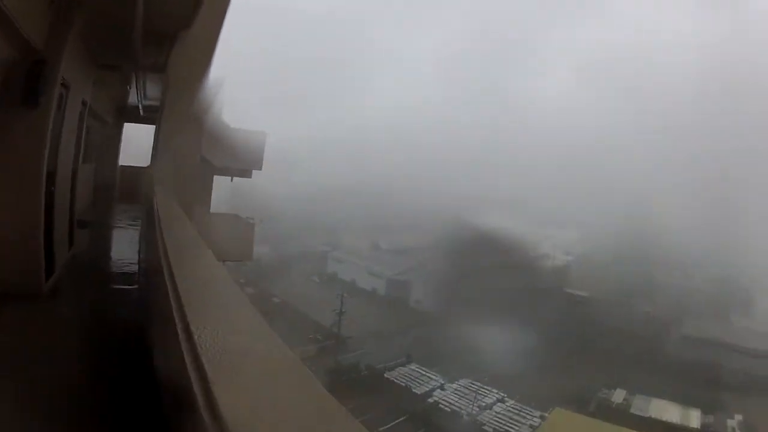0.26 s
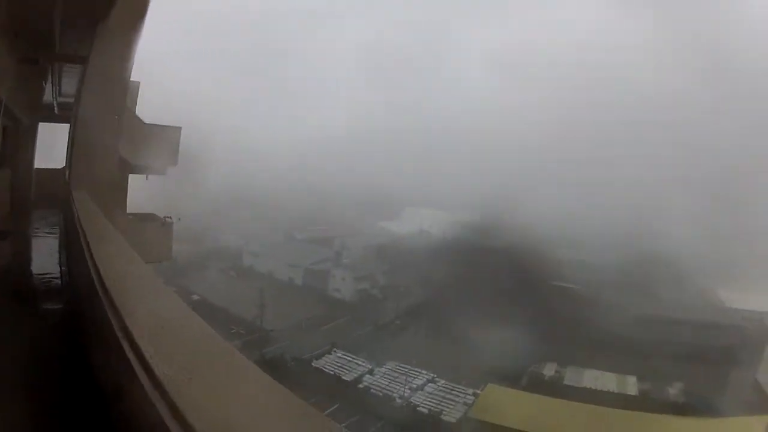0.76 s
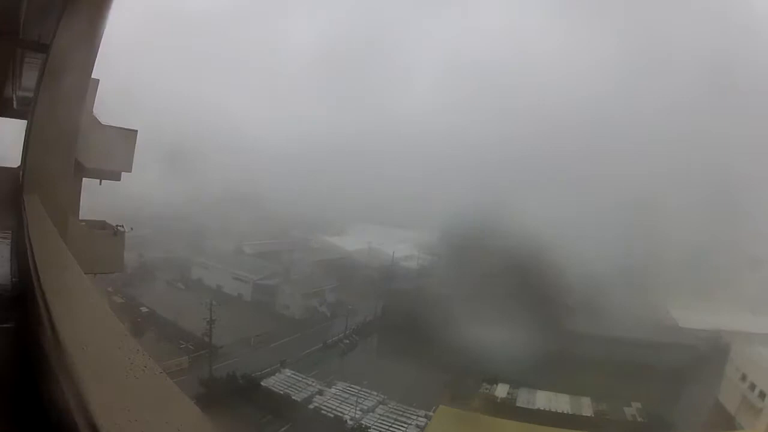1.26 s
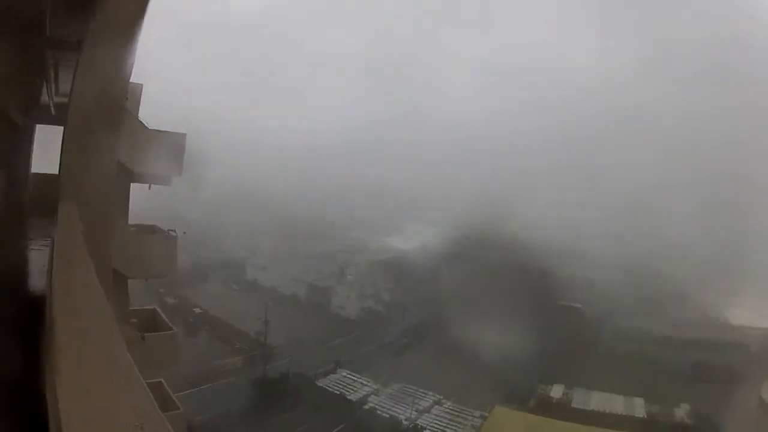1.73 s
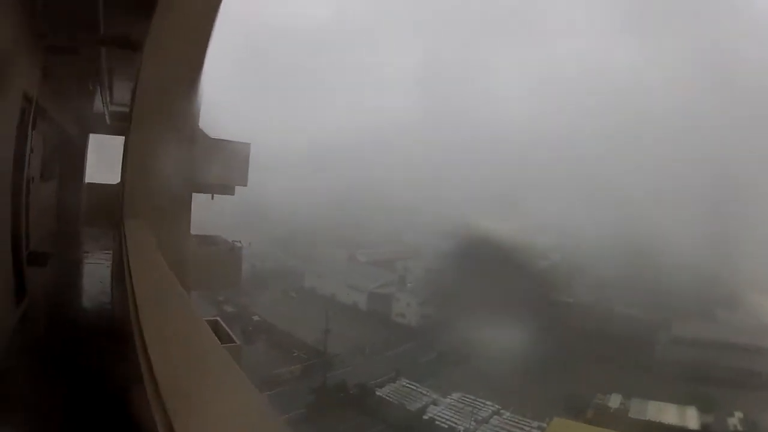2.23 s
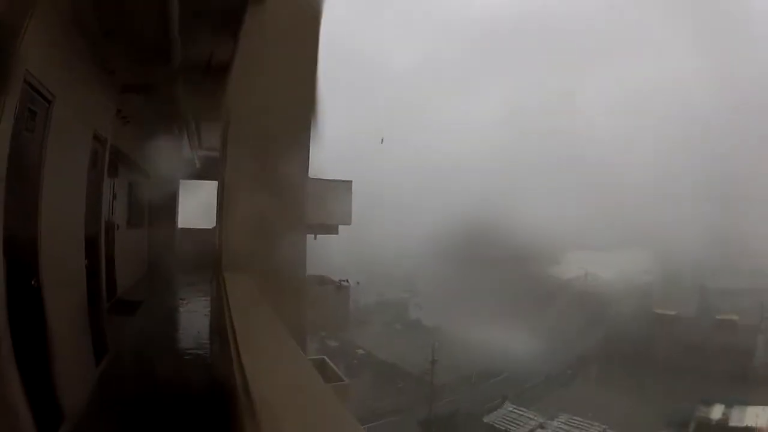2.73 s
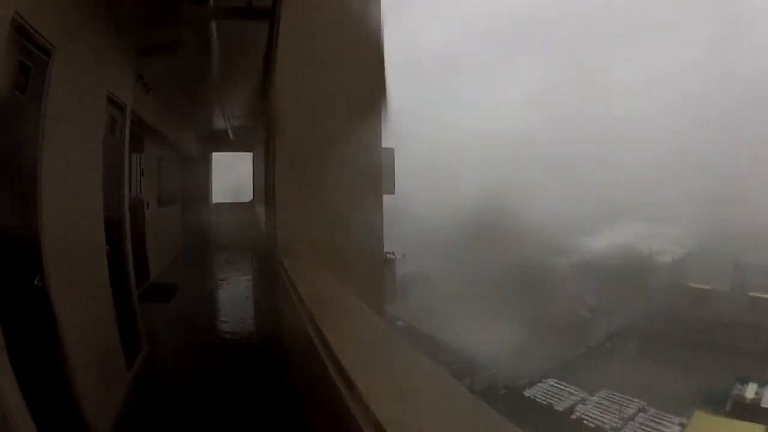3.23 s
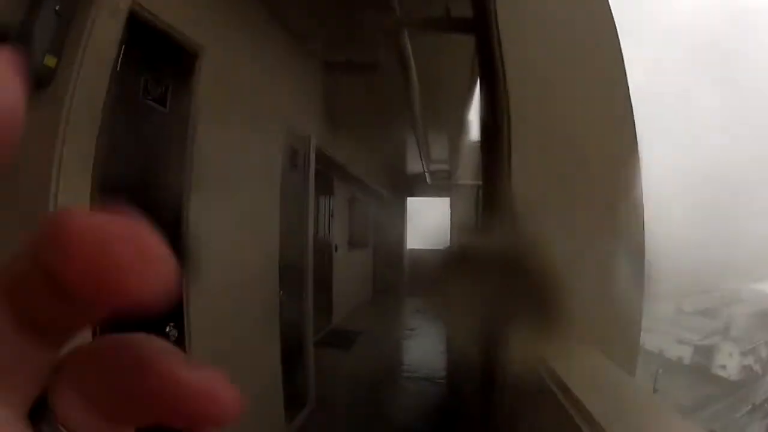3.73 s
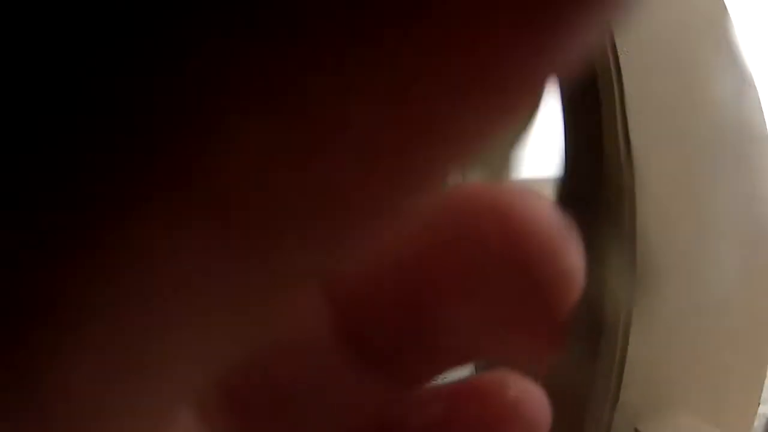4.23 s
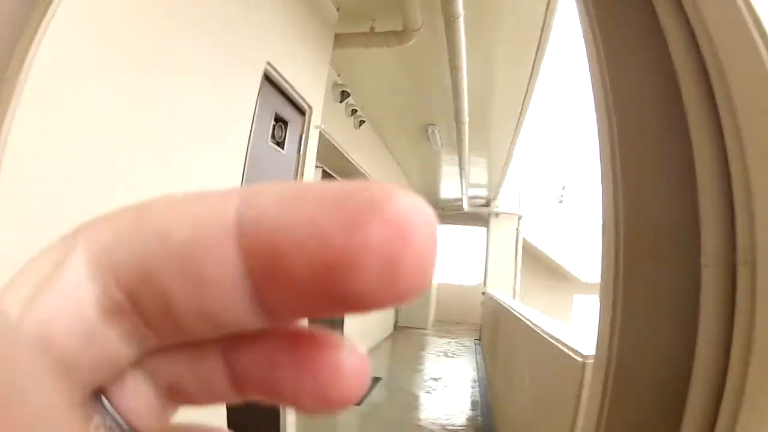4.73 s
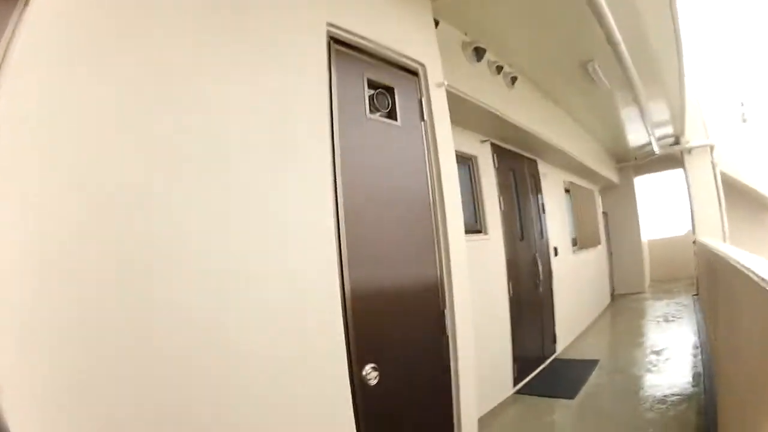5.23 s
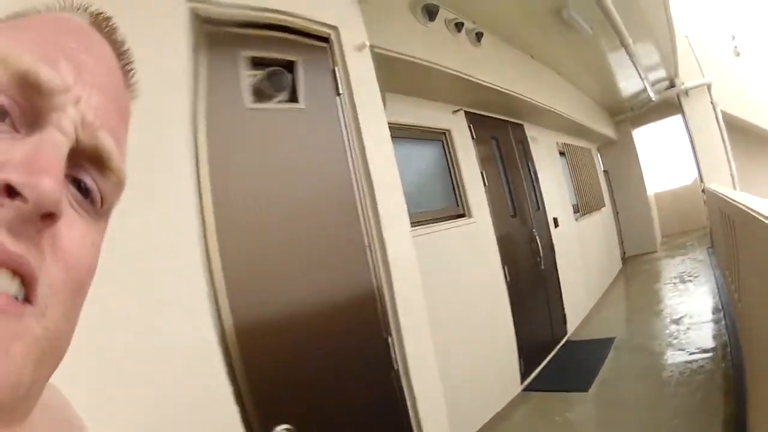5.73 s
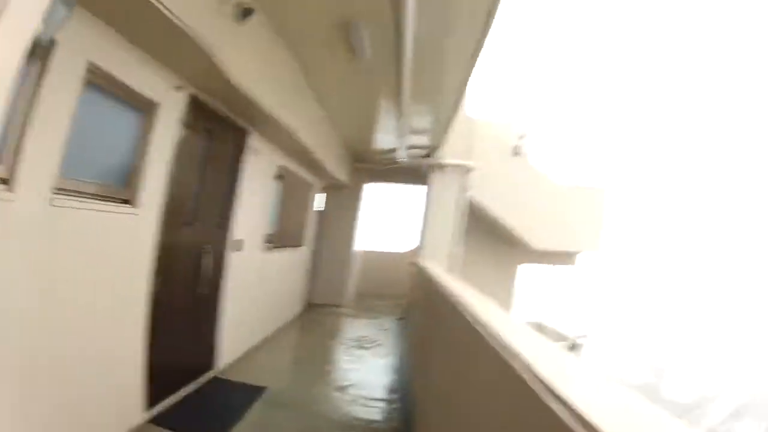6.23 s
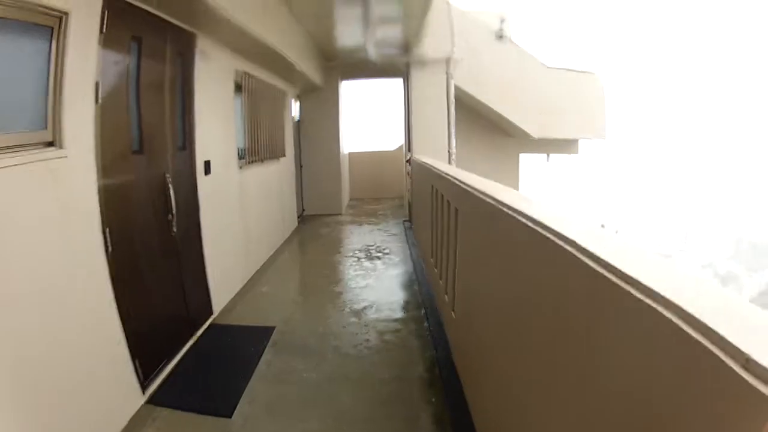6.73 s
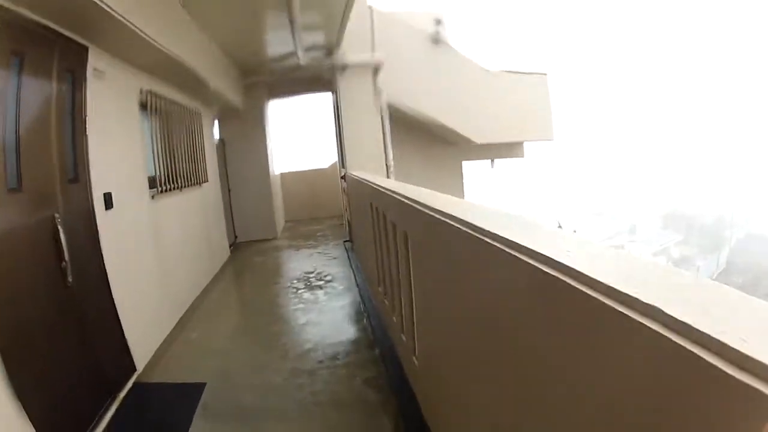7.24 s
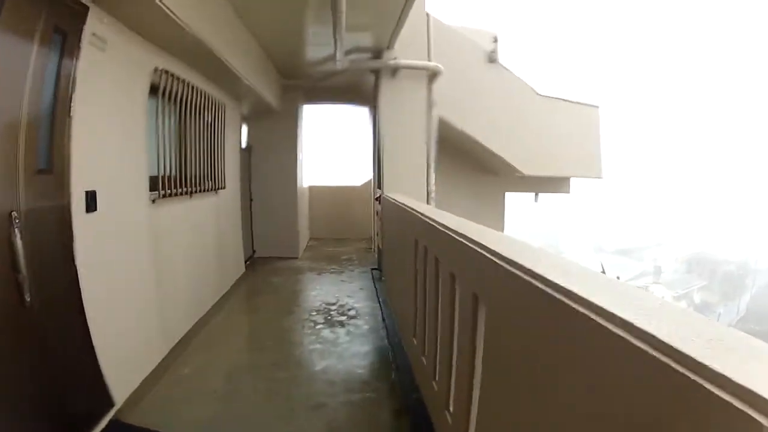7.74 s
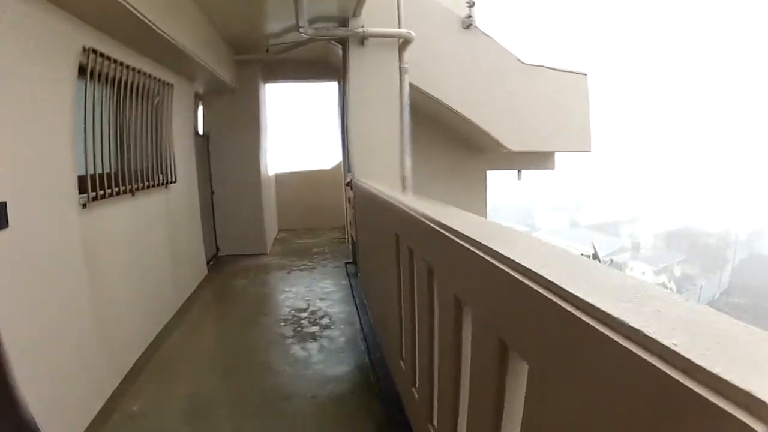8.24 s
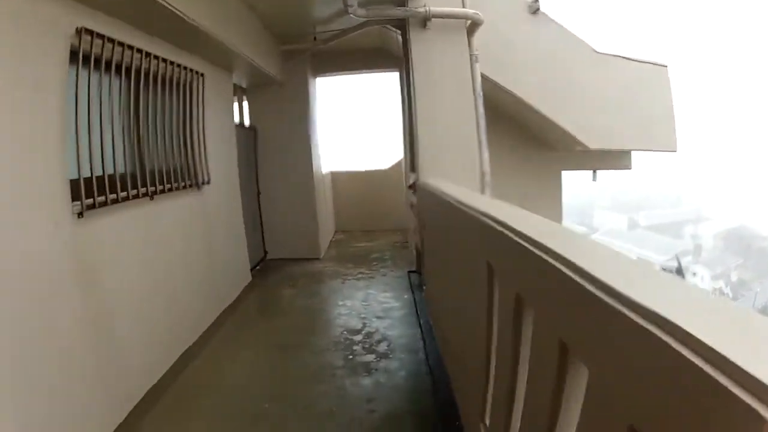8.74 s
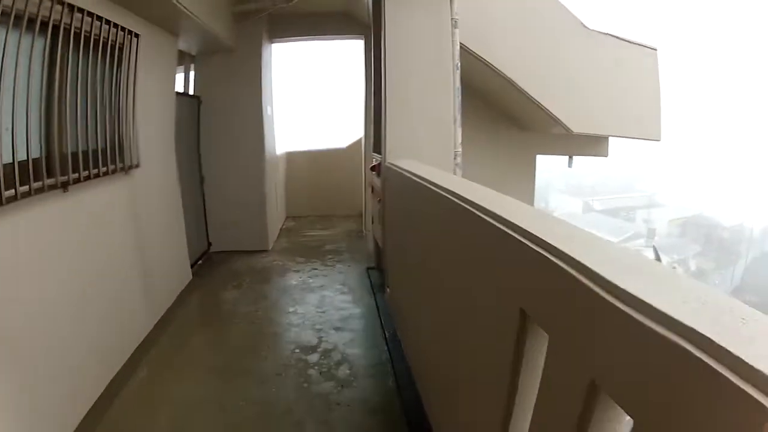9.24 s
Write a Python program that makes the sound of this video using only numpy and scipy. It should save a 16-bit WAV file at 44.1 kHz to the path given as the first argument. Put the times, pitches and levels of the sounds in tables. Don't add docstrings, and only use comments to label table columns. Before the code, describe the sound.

A handheld camera in a waterproof housing picks up constant storm wind on a high balcony corridor: soft low rumble beneath a coarse midrange roar. Grit clicks on the case a few times, then a very close, loud double thump and a short squeaky wipe interrupt. Afterwards thin, breathy railing whistles waver within the wind, which grows a little quieter towards the end.

```python
import sys
import numpy as np
from scipy import signal
from scipy.io import wavfile
from scipy.ndimage import uniform_filter1d

SR = 44100
rng = np.random.default_rng(int(sys.argv[2]) if len(sys.argv) > 2 else 0)


def voltage_ratio(decibels):
    exponent = np.asarray(decibels, float) / 20
    return 10 ** exponent


def wav_out(sig):
    wavfile.write(sys.argv[1], SR, np.round(np.clip(np.atleast_2d(sig).T, -1, 1) * 32767).astype(np.int16))


N = 417627


def evened(x):
    return x / np.sqrt(np.mean(x ** 2) + 1e-20)


def read(points, hz):
    f, value = np.transpose(points)
    return np.interp(np.log(hz + 1), np.log(f + 1), value)


def add(mix, s, sound):
    part = mix[round(s * SR):][:len(sound)]
    part += sound[:len(part)]


# time in seconds, level in dB.
GUST = [(0.0, -32.5), (0.73, -35.5), (1.5, -35), (1.74, -37), (2.77, -37.5), (3.66, -35.5), (4.53, -37.5),
        (4.93, -35), (5.41, -35), (5.72, -33), (5.99, -35), (7.09, -37), (7.36, -38), (7.78, -39),
        (8.52, -39), (9.2, -37.5), (9.47, -38)]
# time in seconds, amount turned from 0 to 1.
TURN = [(0, 1), (1.1, 0.4), (1.9, 0.24), (2.4, 0), (3.75, 0), (4.1, 0.77), (6.7, 0.88), (7.1, 0.15),
        (9.47, 0.3)]
# time in seconds, strength from 0 to 1.
EDDIES = [(1.45, 1), (2.45, .5), (3.5, 0.6), (4.55, 1), (5.9, 0.5), (6.7, 0.5)]
EDDY_S = 0.22


def wind(spectrum, answers, size, db, patchy_db, patch_hz, patch_s, flicker_db, flicker_s):
    hop = size // 4
    frames, hz = N // hop + 5, np.fft.rfftfreq(size, 1 / SR)
    t = np.arange(frames) * hop / SR
    real, imaginary, patches = rng.standard_normal((frames, len(hz), 3)).T

    patches = uniform_filter1d(patches, max(round(patch_hz * size / SR), 1), 0)
    patches = evened(uniform_filter1d(patches, max(round(patch_s * SR / hop), 1), 1))
    flicker = rng.standard_normal(frames)
    flicker = evened(uniform_filter1d(flicker, max(round(flicker_s * SR / hop), 1)))

    gust = np.interp(t, *np.transpose(GUST))
    turned = np.interp(t, *np.transpose(TURN))
    eddy = sum(k * np.exp(-((t - s) / EDDY_S) ** 2) for s, k in EDDIES)
    controls = np.array([gust - gust.mean(), turned - .5, eddy])
    centres, *amounts = np.transpose(answers)
    amounts = np.array([read(np.c_[centres, row], hz) for row in amounts])

    field_db = read(spectrum, hz)[:, None] + amounts.T @ controls
    field_db = field_db + patchy_db * patches + flicker_db * flicker
    field = (real + 1j * imaginary) * voltage_ratio(field_db)
    sound = signal.istft(field, nperseg=size, noverlap=size - hop)[1][:N]
    return voltage_ratio(db) * evened(sound)


# frequency in Hz, level in dB per Hz.
RUMBLE = [(8, -32), (20, 0.5), (45, 1.5), (62, 0.5), (95, -1.5), (130, 0), (155, -1.5), (185, -1.5),
          (260, -2), (305, -5), (400, -7), (700, -16), (900, -23.5), (1500, -80)]
# frequency in Hz, dB per dB of gust, dB when turned, dB in an eddy.
BUFFET_ANSWERS = [(60, 0, 2.5, 2.9), (219, 0.46, 0.5, -0.7)]


def buffeting():
    return wind(RUMBLE, BUFFET_ANSWERS, size=2048, db=-39.5, patchy_db=1.5, patch_hz=90, patch_s=.1,
                flicker_db=.9, flicker_s=.03)


# frequency in Hz, level in dB per Hz.
CASE = [(440, -34), (750, -19), (862, -13.5), (1120, -3), (1250, -3.5), (1330, -13), (1470, -6.5),
        (1680, -12.5), (1920, -1.5), (2860, -0.5), (3180, -3), (3620, -3.5), (4390, -14), (4790, -12),
        (6000, -22), (7800, -54), (13200, -120)]
# frequency in Hz, dB per dB of gust, dB when turned, dB in an eddy.
ROAR_ANSWERS = [(1110, 0.91, -3.5, .3), (1520, 0.68, -0.7, 4.7), (2680, 0.89, -0.9, 0.091),
                (4000, 0.51, 1.4, 0.32)]


def case_roar():
    return wind(CASE, ROAR_ANSWERS, size=512, db=-35.5, patchy_db=0.66, patch_hz=600, patch_s=0.054,
                flicker_db=0.08, flicker_s=.04)


# time in seconds, gain in dB.
AIR_DIP = [
    (4.345, 0.5),
    (4.349, -2),
    (4.357, -7),
    (4.367, 0),
]


def dipped(sound):
    return sound * voltage_ratio(np.interp(np.arange(N) / SR, *np.transpose(AIR_DIP)))


def ring(db, hz, rise, t60):
    t = np.arange(round(.15 * SR)) / SR
    return voltage_ratio(db - 60 * t / t60) * (1 - np.exp(-t / rise)) * np.sin(2 * np.pi * hz * t)


# start in seconds, peak in dB, frequency in Hz,
# rise in seconds, 60 dB decay in seconds.
PUSHES = [
    (4.3371, 11, 215, 0.0021, 0.015),
    (4.3471, 18.5, 148, 0.0003, 0.0082),
]


def add_pushes(mix):
    for s, *shape in PUSHES:
        add(mix, s, ring(*shape))


# start in seconds, peak in dB, frequency in Hz,
# swings until silent.
PULLS = [
    (3.977, -15.5, 55, 3.7),
    (4.3416, -6, 60, 2.6),
    (4.3455, 5.5, 327, 3.3),
    (4.353, -5, 78, 2.6),
    (4.756, -20, 140, 5),
    (4.7732, -10, 130, 5.2),
    (4.801, -21, 77, 2.4),
    (4.814, 1.5, 90.5, 3.1),
    (8.881, -25, 140, 5.5),
]
PULL_RISE_TURNS = 0.15


def add_pulls(mix):
    for s, db, hz, swings in PULLS:
        add(mix, s, -ring(db, hz, PULL_RISE_TURNS / hz, swings / hz))


# start in seconds, length in seconds, start frequency in Hz,
# end frequency in Hz, peak in dB.
SQUEAKS = [
    (4.661, .02, 1960, 2080, -18),
    (4.667, .022, 3950, 4550, -32),
    (4.681, .014, 2180, 2660, -23),
    (4.701, .01, 3200, 3700, -35),
    (4.807, .011, 1900, 1880, -16),
]


def squeak(length, start_hz, end_hz, db):
    t = np.arange(round(length * SR)) / SR
    wobble = 1 + 0.13 * uniform_filter1d(rng.standard_normal(2000), 60)[:len(t)]
    turns = np.cumsum(np.linspace(start_hz, end_hz, len(t)) * wobble) / SR
    return voltage_ratio(db) * np.sin(2 * np.pi * turns) * np.sin(np.pi * t / length) ** .9


def hum(hz, width_hz, steady=0):
    r = np.exp(-np.pi * width_hz / SR)
    waver = rng.standard_normal((len(hz), 2)) @ [1, 1j]
    for _ in range(2):
        waver = signal.lfilter([1 - r], [1, -r], waver)
    waver = steady + waver / np.sqrt(np.mean(abs(waver) ** 2))
    return evened((waver * np.exp(2j * np.pi * np.cumsum(hz) / SR)).real)


# frequency in Hz, width in Hz, level in dB.
SCRAPE_MODES = [(450, 400, -29), (1050, 400, -27), (1500, 300, -29), (2250, 500, -25), (3200, 900, -36),
                (4500, 700, -34)]
# frequency in Hz, width in Hz, level in dB.
WIPE_MODES = [(110, 120, -30), (330, 300, -41)]


def scrape(length, modes):
    t = np.arange(round(length * SR)) / SR
    shaken = 0
    for hz, width_hz, db in modes:
        shaken = shaken + voltage_ratio(db) * hum(np.full(8000, hz), width_hz)[-len(t):]
    return shaken * np.sin(np.pi * t / length)


# start in seconds, peak in
# dB, frequency in Hz, rise in seconds, # 60 dB decay in seconds.
TICKS = [(2.0168, 7, 2320, .0011, .0052), (2.0168, -12, 4800, .0004, .004),
         (2.0182, -19, 5600, .0002, .004), (2.0171, -12, 1300, .0004, .005),
         (3.625, -17, 1900, .0002, .005), (3.9768, -14, 2150, .0002, .012), (3.9775, -20, 2000, .001, .02),
         (3.977, -20, 4700, .0003, .006), (4.3462, -3, 1900, .0002, .005), (4.3395, -20, 2100, .001, .012),
         (4.3465, -10, 1300, .0003, .006), (4.3378, -14, 1000, .0006, .008)]


def add_ticks(mix):
    for s, *shape in TICKS:
        add(mix, s, ring(*shape))


# start in seconds, level in dB.
SNAPS = [
    (2.0168, -11),
    (3.625, 0),
    (3.9768, 3),
    (4.3462, -26),
]


def snap(db):
    wall = signal.butter(2, [1500, 5500], "bandpass", fs=SR, output="sos")
    return voltage_ratio(db) * signal.sosfilt(wall, signal.unit_impulse(400, idx=8))


# start in seconds, length in seconds, start frequency in Hz,
# end frequency in Hz, level in dB.
WHISTLES = [(4.99, .09, 3110, 3110, -39), (5.36, .6, 3110, 3180, -44), (6.16, .11, 3120, 3125, -40),
            (6.3, .22, 3110, 3120, -48), (6.47, .25, 3150, 3090, -41), (6.64, .24, 3060, 3020, -39),
            (6.83, .42, 3120, 3065, -40.5), (7.2, .2, 3065, 3050, -47), (5.5, .25, 3330, 3350, -42),
            (5.7, .16, 3230, 3170, -42)]


def whistle(length, start_hz, end_hz, db, width_hz, steady):
    u = np.linspace(0, 1, round(length * SR))
    noise = rng.standard_normal((2, 3 * SR))
    wander, flicker = (evened(uniform_filter1d(row, 1800))[:len(u)] for row in noise)
    pitch = (start_hz + (end_hz - start_hz) * u) * (1 + .006 * wander)
    swell = np.minimum(np.minimum(u, 1 - u) / .15, 1) ** .5
    return swell * voltage_ratio(db + 1.2 * flicker) * hum(pitch, width_hz, steady)


# start in seconds, length in seconds, start frequency in Hz,
# end frequency in Hz, level in dB.
MOANS = [(5.45, .52, 3380, 3380, -40.5), (0, 1.7, 2530, 2480, -45), (1.7, 2.4, 2560, 2570, -47),
         (4.1, 2.7, 2480, 2490, -44), (7.0, 2.46, 2550, 2560, -48), (4.7, 1.8, 1990, 2030, -45),
         (6.45, .45, 1950, 1910, -43), (.25, .95, 2700, 2780, -44), (5.4, .65, 2500, 2480, -44)]


def add_railing(air):
    for s, *shape in WHISTLES:
        add(air, s, whistle(*shape, width_hz=90, steady=.8))
    for s, *shape in MOANS:
        add(air, s, whistle(*shape, width_hz=200, steady=0))


def scene():
    mix = buffeting()
    air = case_roar()
    add_railing(air)
    mix += dipped(air)
    add_pushes(mix)
    add_pulls(mix)
    for s, *shape in SQUEAKS:
        add(mix, s, squeak(*shape))
    add(mix, 4.805, scrape(.014, SCRAPE_MODES))
    add(mix, 4.735, scrape(.12, WIPE_MODES))
    add_ticks(mix)
    for s, db in SNAPS:
        add(mix, s, snap(db))
    return mix[None]


def below(x, hz):
    lowpass = signal.firwin(1023, hz, window=("kaiser", 12), fs=SR)
    return signal.oaconvolve(x, lowpass[None], "same")


def top_cut(x):
    return signal.sosfilt(signal.butter(12, 16640, fs=SR, output="sos"), x)


def record(dry):
    slow = np.clip(signal.resample_poly(dry, 40, 147, axis=1), -1, 1)
    held = np.repeat(slow, 4, axis=1)
    held = signal.resample_poly(held, 147, 160, axis=1)[:, :N]
    body = below(held, 15350)
    top = below(held, 16500) - body

    jump = abs(held - uniform_filter1d(held, 30))
    sudden = uniform_filter1d((jump > .27) * 1., 60) > 1e-6
    kept = body + voltage_ratio(-12) * top * uniform_filter1d(sudden * 1., 100)
    return top_cut(np.clip(kept, -1, 1))


dry = scene()
out = record(dry)
wav_out(out)
```